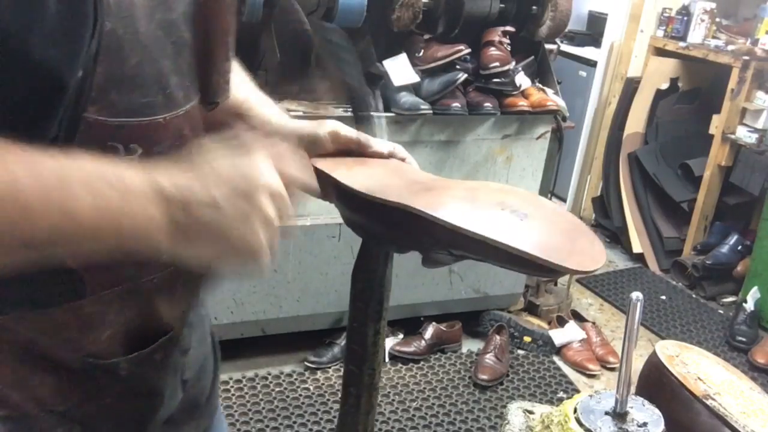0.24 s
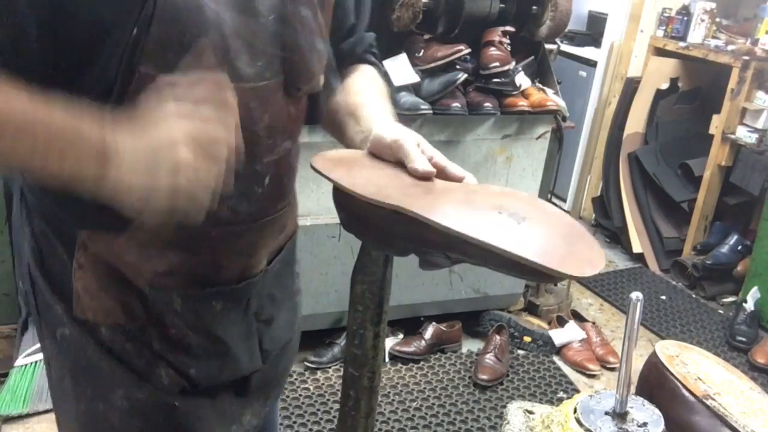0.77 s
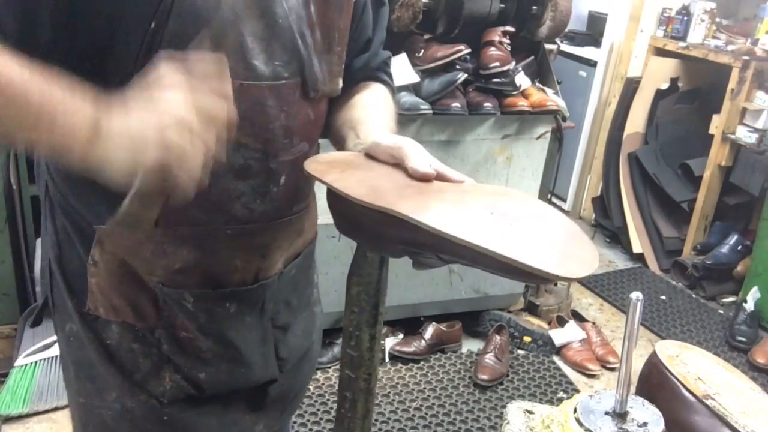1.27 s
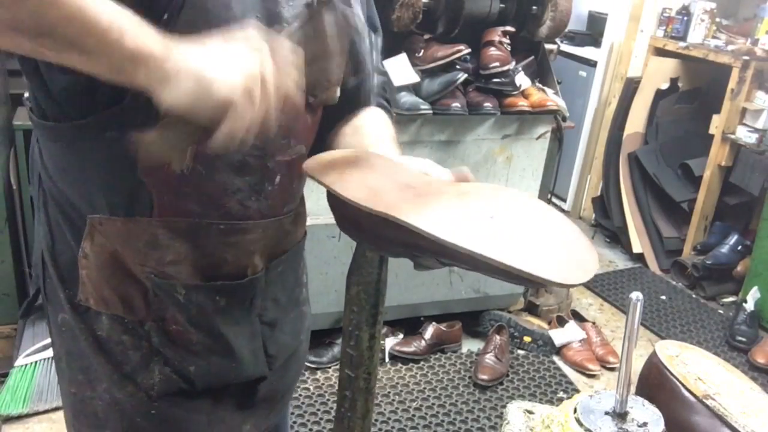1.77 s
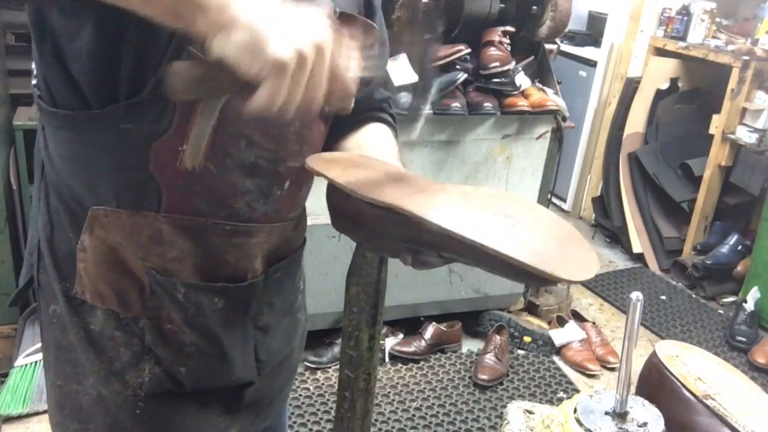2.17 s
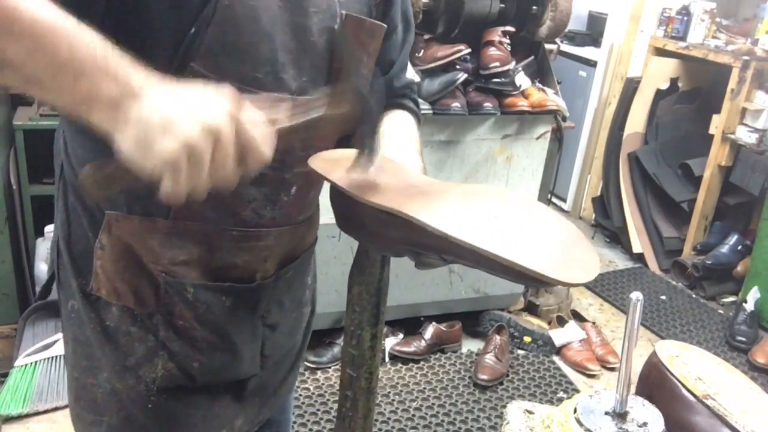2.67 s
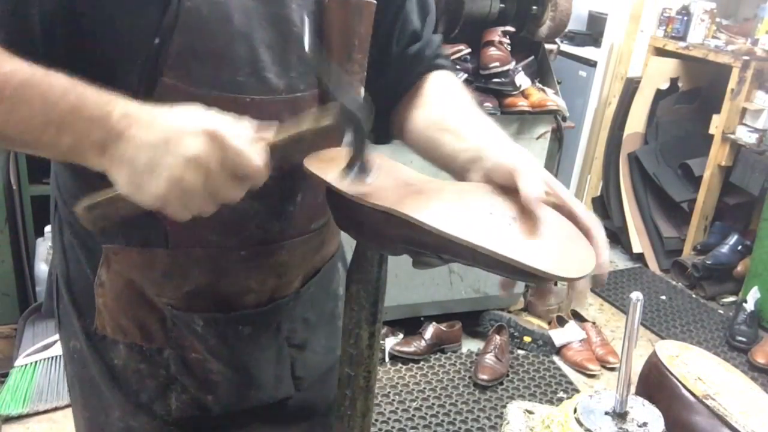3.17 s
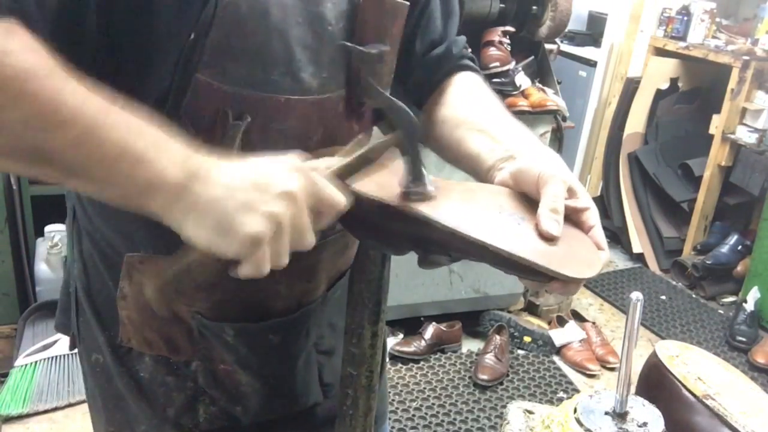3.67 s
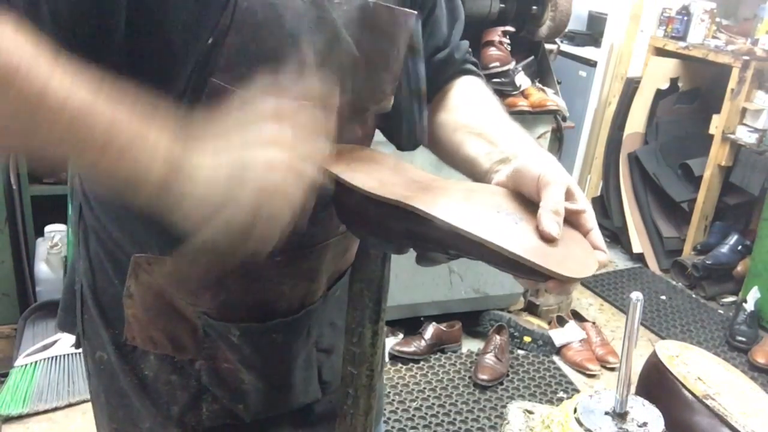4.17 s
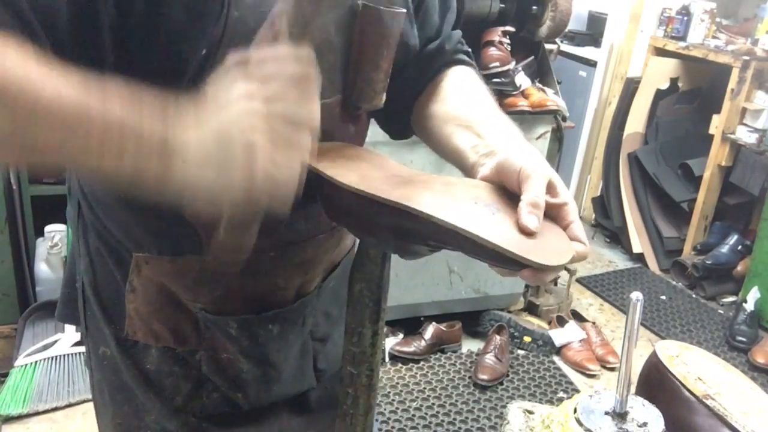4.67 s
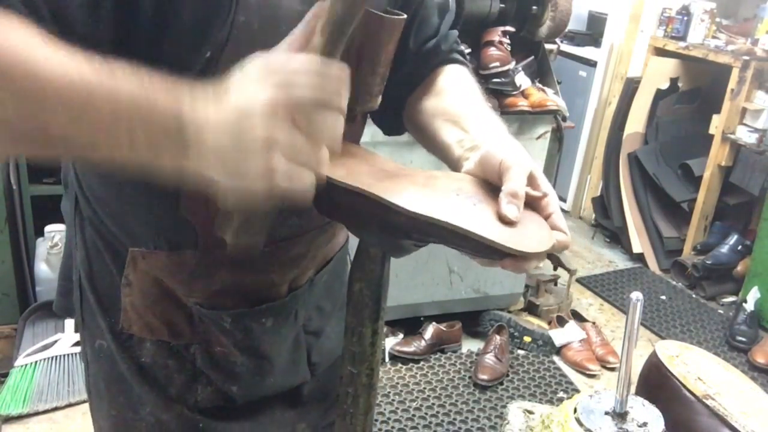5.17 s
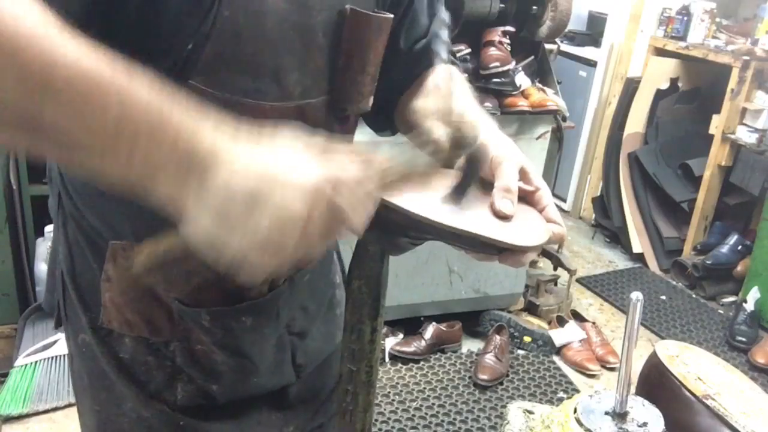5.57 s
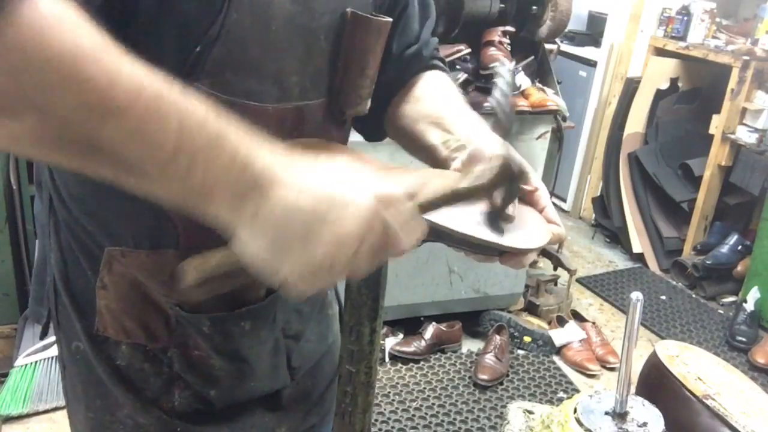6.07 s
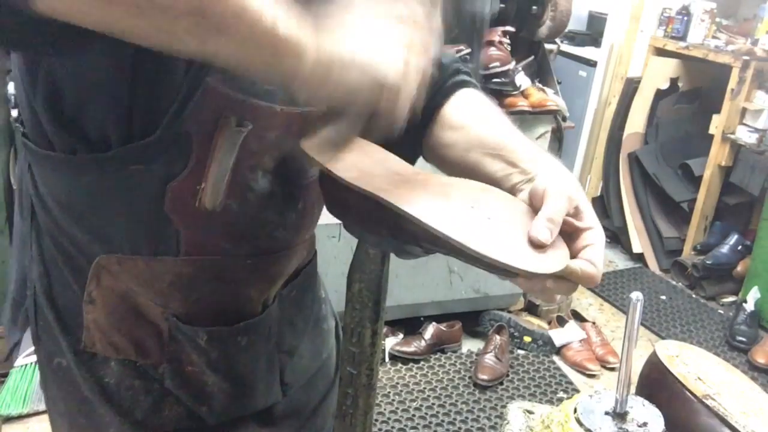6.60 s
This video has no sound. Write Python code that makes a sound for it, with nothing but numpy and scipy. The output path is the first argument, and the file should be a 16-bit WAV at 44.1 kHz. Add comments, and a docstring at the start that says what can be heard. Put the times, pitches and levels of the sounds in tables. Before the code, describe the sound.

A hammer knocks rapidly and evenly on a leather shoe sole over an iron last, loud and close, with a soft workshop hum beneath.

```python
"""A shoemaker hammers a leather sole on an iron last, about four blows a second, first towards the heel, then the waist.
Each blow is filtered bursts for the crack and knock of the sole, decaying sines for the ringing hammer and iron,
and low sines for the thud of stand and floor. In two pauses a hand slides over the shoe as swelling noise; a short
soft swell also comes in just before the final blow, and small ticks of handling are scattered between.
Behind it the small workshop answers with dense echoes and hums softly; a fast limiter holds the attacks down."""
import sys
import numpy as np
from scipy import signal
from scipy.fft import rfft, irfft
from scipy.io import wavfile
from scipy.ndimage import uniform_filter1d

SR = 44100
rng = np.random.default_rng(int(sys.argv[2]) if len(sys.argv) > 2 else 0)


def to_wav(s):
    """Save 16-bit WAV."""
    ch = np.atleast_2d(s).T  # columns
    pcm = np.round(np.clip(ch, -1, 1) * 32767)  # PCM
    wavfile.write(sys.argv[1], SR, pcm.astype(np.int16))


N = 301581
SIZE = 24576  # samples given to one blow
AGE = np.arange(SIZE) / SR  # seconds since the start of a blow
HZ = np.maximum(np.arange(SIZE // 2 + 1) * SR / SIZE, 1)


def from_db(db):
    """Decibels to gain."""
    return 10 ** (np.asarray(db) / 20)


def unit(x):
    """Scale to an energy of one."""
    return x / np.sqrt(np.sum(x ** 2) + 1e-20)


def at_hz(points, hz):
    """Read a curve on a log-frequency axis."""
    points = np.array(points)
    return np.interp(np.log(hz), np.log(points[:, 0]), points[:, 1])


def at_place(ends, place):
    """A value between the heel (0) and the waist (1)."""
    return (1 - place) * ends[0] + place * ends[1]


def fade(t60):
    """Exponential decay over one blow, falling 60 dB in t60 seconds."""
    return np.exp(-np.log(1000) * AGE / t60)


def add(out, start_s, sound):
    """Mix a sound in at a time, trimmed to the scene."""
    start = round(start_s * SR)
    first, last = max(start, 0), min(start + len(sound), N)
    out[first:last] += sound[first - start:last - start]


def wander(per_s, count):
    """A smooth random curve over the scene, taking a new value per_s times a second."""
    return np.interp(np.arange(N) / SR * per_s, np.arange(count), rng.standard_normal(count))


def noise(spectrum):
    """Steady coloured noise, rms 1."""
    hz = np.maximum(np.arange(N // 2 + 1) * SR / N, 1)
    coloured = irfft(rfft(rng.standard_normal(N)) * from_db(at_hz(spectrum, hz)), N)
    return np.sqrt(N) * unit(coloured)


def bumps_db(peaks, spread):
    """Gain in dB of a set of resonances, each a little stronger or weaker every time."""
    gain_db = 0
    for hz, width_hz, db in peaks:
        height_db = db * (1 + spread * rng.normal())
        gain_db = gain_db + height_db / (1 + (2 * (HZ - hz) / width_hz) ** 2)
    return gain_db


def shelf_db(hz, db):
    """Gain in dB of a treble shelf."""
    return db / (1 + (hz / HZ) ** 4)


def through(x, gain_db):
    """Causal (minimum-phase) filter with the given gain, made by folding the cepstrum."""
    cepstrum = irfft(np.log(from_db(gain_db)))
    cepstrum[1:SIZE // 2] *= 2
    cepstrum[SIZE // 2 + 1:] = 0
    return irfft(rfft(x) * np.exp(rfft(cepstrum)))


# motor hum, two steady pitches: pitch_hz [Hz], level_db [dB rms before the waver]
MOTOR_HUM = [(59, -55.5), (119, -62)]
# colour of the air in the workshop: pitch_hz [Hz], level_db [relative dB per Hz]
AIR_COLOUR = [(30, -4), (90, 13), (194, -4.5), (300, -6), (540, -8), (866, -10.5), (1280, -12),
              (2170, -16.5), (4080, -19.5), (6720, -25), (14000, -38)]


def workshop(air_db=-54.5, waver_db=2.5, waver_per_s=6):
    """A motor hum of two gently wavering sines under steady coloured room noise."""
    t, hum = np.arange(N) / SR, 0
    for hz, db in MOTOR_HUM:
        level_db = db + waver_db * wander(waver_per_s, 128)
        hum = hum + np.sqrt(2) * from_db(level_db) * np.sin(2 * np.pi * (hz * t + rng.random()))
    return hum + from_db(air_db) * noise(AIR_COLOUR)


# decay of the workshop: pitch_hz [Hz], t60_s [s]
ROOM_DECAY = [(100, 0.32), (400, 0.19), (1200, 0.16), (3500, 0.16), (7000, 0.14), (15000, 0.092)]
# colour of its echoes: pitch_hz [Hz], level_db [relative dB]
ECHO_COLOUR = [(100, 11.5), (250, -4), (350, -0.5), (460, -5.5), (600, 0.5), (1150, 1), (1700, -4),
               (2900, 0.5), (3700, -2.5), (7000, -4.5), (9500, -3.5), (15000, -7)]


def echoes(build_s=0.0073, gap_s=0.0048):
    """The workshop's answer to a click: dense echoes that build up, then die band by band."""
    white, tail = rfft(rng.standard_normal(SIZE)), 0
    swell = 1 - np.exp(-np.maximum(AGE - gap_s, 0) / build_s)
    edges = [0, *np.geomspace(150, SR / 2, 11)]
    for low, high in zip(edges, edges[1:]):
        centre = (low + high) / 2
        band = irfft(white * ((HZ >= low) & (HZ < high)))
        envelope = unit(swell * fade(at_hz(ROOM_DECAY, centre)))
        tail = tail + band * envelope * from_db(at_hz(ECHO_COLOUR, centre))
    return tail


# short swells of soft noise, the last just before the final blow:
# start_s [s], length_s [s], level_db [dB at mid-swell, before the unevenness]
NOISE_SWELLS = [(0.544, 0.31, -68), (2.98, 0.38, -75.5), (6.67, 0.12, -53)]
# colour of the swells and the ticks: pitch_hz [Hz], level_db [relative dB per Hz]
SOFT_COLOUR = [(200, -22), (1200, 5.5), (2200, 5.5), (4500, 0), (8000, -12), (15000, -25.5)]


def soft_swells(flutters_per_s=35, flutter_db=2.5):
    """Noise swells and fades unevenly: a hand on the shoe in two pauses, then a short swell by the final blow."""
    t, swell = np.arange(N) / SR, 0
    for start_s, length_s, db in NOISE_SWELLS:
        progress = np.clip((t - start_s) / length_s, 0, 1)
        swell = swell + from_db(db) * np.sin(np.pi * progress)
    flutter = from_db(flutter_db * wander(flutters_per_s, 512))
    return swell * flutter * noise(SOFT_COLOUR)


# small ticks of handling: start_s [s], level_db [dB peak]
HANDLING_TICKS = [(0.66, -45.5), (0.676, -45.5), (1.908, -27), (2.176, -32), (3.051, -37), (6.575, -41)]


def ticks(tick_t60=0.014, room_db=-5):
    """The shoe ticks as it shifts: short noise bursts with the room's echoes."""
    out = np.zeros(N)
    for start_s, db in HANDLING_TICKS:
        burst = unit(rng.standard_normal(SIZE) * fade(tick_t60))
        tick = through(burst + from_db(room_db) * echoes(), at_hz(SOFT_COLOUR, HZ))
        add(out, start_s, from_db(db) * tick / np.abs(tick).max())
    return out


# the stand and the boards under it: delay_s [s], pitch_hz [Hz], level_db [relative dB], t60_s [s]
FLOOR_MODES = [(.003, 67, -19, 0.15), (.005, 135, -26, 0.11), (0.0355, 102, -15, 0.051),
               (0.046, 54.85, -33, 0.94), (0.044, 91.4, -38, 0.43), (0.043, 112, -40, .45)]


def floor_thud(rise_s=0.0019):
    """The stand thuds almost at once; the boards rebound a moment later and rumble on as low sines."""
    thud = 0
    for delay_s, hz, db, t60 in FLOOR_MODES:
        age = np.maximum(AGE - delay_s, 0)
        envelope = (1 - np.exp(-age / rise_s)) * np.exp(-np.log(1000) * age / t60)
        thud = thud + from_db(db) * envelope * np.sin(2 * np.pi * hz * age)
    return thud


def ringing(modes, spread_db=2.5, detune=0.0046, waver=1.0, waver_hz=70, longest_t60=.19):
    """Struck modes, each with a new strength at every blow; their own echoes make them waver."""
    out = np.zeros(SIZE)
    for hz, db, t60 in modes:
        knots = rng.standard_normal((2, 64))
        scatter = np.interp(AGE * waver_hz, np.arange(64), knots[0] + 1j * knots[1])
        tone = np.exp(2j * np.pi * hz * (1 + detune * rng.normal()) * AGE)
        wavering = ((1 + waver * scatter) * tone).imag / np.sqrt(1 + 2 * waver ** 2)
        # hand and leather damp the metal, so no mode rings past longest_t60
        out += from_db(db + spread_db * rng.normal()) * fade(min(t60, longest_t60)) * wavering
    return out


# modes of the iron last and stand: pitch_hz [Hz], level_db [relative dB], t60_s [s before damping]
IRON_MODES = [(1187, -17.5, .19), (970, -31.5, .15), (2080, -30.5, 0.25), (4320, -36, 0.18),
              (5464, -37.5, 0.47), (5920, -40, 0.27), (6240, -42, .14), (7200, -47.5, 0.19),
              (7100, -41, .14), (8800, -52, .12)]


def iron_ring(level_db):
    """The iron last and stand ring briefly as damped modes."""
    return from_db(level_db) * ringing(IRON_MODES)


# modes of the hammer and its handle: pitch_hz [Hz], level_db [relative dB], t60_s [s before damping]
HAMMER_MODES = [(353.3, -27, 0.27), (596, -34.5, .19), (1278, -32, 0.2), (2180, -32, 0.22),
                (3070, -37, 0.16), (3170, -32, 0.2), (3720, -35.5, .11), (3950, -39, .13),
                (4220, -39.5, .13)]


def hammer_ring(lively_db, per_lively=1.1):
    """The hammer and handle ring as damped modes, louder on a lively blow."""
    return from_db(per_lively * lively_db) * ringing(HAMMER_MODES)


def contact(shortest_s=.0006, longest_s=.0026, bounce=0.64, crush_t60=0.043, crush_db=-9,
            bass_lag_s=0.002794, lag_hz=800, soft_hz=4500, count=3):
    """The push into the sole: a soft click smeared by quick reflections, with the crunch of the leather giving way."""
    # bending waves travel slower at low pitch, so the knock arrives after the crack
    travel_s = bass_lag_s / (1 + (HZ / lag_hz) ** 2)
    dispersion = np.exp(-2j * np.pi * np.cumsum(travel_s) * SR / SIZE)
    softness = 1 / (1 + 1j * HZ / soft_hz)
    crush = from_db(crush_db) * unit(rng.standard_normal(SIZE) * fade(crush_t60))
    smear = 1
    for delay_s in np.geomspace(shortest_s, longest_s, count) * rng.uniform(.8, 1.2, count):
        lag = np.exp(-2j * np.pi * HZ * delay_s)
        smear = smear * (lag - bounce) / (1 - bounce * lag)  # all-pass reflection
    return irfft(dispersion * softness * (smear + rfft(crush)))


def crack(length_s=.0017, low_hz=3000):
    """The steel face slaps flat on the leather: a very short, bright burst."""
    burst = unit(rng.standard_normal(SIZE) * np.exp(-(AGE / length_s) ** 2))
    return signal.sosfilt(signal.butter(2, low_hz, "high", fs=SR, output="sos"), burst + 1e-18)


def lesser_modes(count=24):
    """Gain in dB of the shoe's many small resonances, new at every blow; a shelf offsets their mean lift."""
    hz = np.geomspace(1400, 9000, count) * np.exp(rng.normal(0, .03, count))
    return bumps_db(zip(hz, .025 * hz, rng.uniform(0, 8, count)), 0) - shelf_db(1300, 1.5)


# response of the shoe on the last, struck at either end: pitch_hz [Hz], level_db [relative dB]
HEEL_RESPONSE = [(60, -24.5), (190, -21.5), (350, -11.5), (600, -7), (1200, -10.5), (2200, -11.5),
                 (3700, -15.5), (5000, -25), (7000, -27.5), (11000, -35.5), (16000, -38.5)]
WAIST_RESPONSE = [(60, -20), (190, -15), (320, -9), (600, -8.5), (1200, -6), (2200, -7.5), (4000, -10.5),
                  (5000, -15), (7000, -20), (8200, -29), (16000, -35)]
# its resonances and the dips between them: pitch_hz [Hz], width_hz [Hz], level_db [dB before the spread]
HEEL_RESONANCES = [(354, 83, 7), (623, 140, 6), (814, 100, -4), (1030, 93, 2.5), (1118, 18, -8),
                   (1246, 110, 4), (1390, 180, 3), (1630, 120, 1), (2190, 170, 3.5), (3065, 390, -11.5),
                   (3200, 120, 11), (3680, 80, 3), (5920, 1300, 5)]
WAIST_RESONANCES = [(510, 44, -2.5), (685, 96, 8), (773, 90, -8.5), (972, 110, 5), (1210, 55, 1.5),
                    (1360, 58, -4.5), (1556, 130, -1), (1834, 110, -5), (2120, 360, 3.5), (2880, 580, -10),
                    (3160, 370, 8.5), (3700, 200, 3.5), (4220, 250, 4)]
# lift of the clack resonance: heel_db [dB], waist_db [dB], both before force
CLACK_LIFT = (9, 4)
CLACK_PER_FORCE = .8  # dB per dB of force
# a flat landing deepens the knock and sharpens the crack and the snap: dB per dB of flatness
KNOCK_PER_FLAT, CRACK_PER_FLAT, SNAP_PER_FLAT = 1, .7, 1


def sole(place, force_db, flat_db, lively_db, clack_hz, direct_db=33, wet_db=27.5, slap_db=0,
         room_peaks=0.84, spread=0.18, knock_hz=571, knock_width=110, knock_peak_db=5, clack_width=80):
    """One blow on the leather, coloured by where, how hard and how squarely the hammer lands."""
    knock_db = KNOCK_PER_FLAT * flat_db
    crack_db = -2.43 + CRACK_PER_FLAT * flat_db
    snap_db = -0.3 + SNAP_PER_FLAT * flat_db
    clack_db = at_place(CLACK_LIFT, place) + CLACK_PER_FORCE * force_db
    colour = at_place((at_hz(HEEL_RESPONSE, HZ), at_hz(WAIST_RESPONSE, HZ)), place)
    colour = colour + knock_db - shelf_db(730, knock_db)  # knock: the lows
    colour = colour + shelf_db(1800, crack_db) + shelf_db(5600, snap_db - crack_db)
    peaks = at_place((bumps_db(HEEL_RESONANCES, spread), bumps_db(WAIST_RESONANCES, spread)), place)
    # each blow favours one low resonance (the knock) and one about an octave above it (the clack)
    favoured = [(knock_hz, knock_width, knock_peak_db), (clack_hz, clack_width, clack_db)]
    peaks = peaks + bumps_db(favoured, 0) + lesser_modes()
    direct = through(contact() + from_db(slap_db) * crack(), direct_db + colour + peaks)
    # the room gathers sound from all sides of the shoe, which evens out its peaks
    room = through(echoes(), wet_db + lively_db + colour + room_peaks * peaks)
    return direct + room


# hammer blows: start_s [s], place [0 heel - 1 waist], force_db [dB], flatness_db [dB],
# liveliness_db [dB], clack_hz [Hz]
HAMMER_BLOWS = [(-0.045, 0.11, 3, -0.5, -4, 1204), (0.2038, .1, 0, -4.5, 1.5, 1235),
                (0.4517, 0, -2.5, -2, 0.5, 1217), (0.8824, 0.048, -1, 0, 3.5, 1270),
                (1.133, 0.13, -1, -2.5, 4.5, 1363), (1.3855, .1, -0.5, 1.5, -1.5, 1233),
                (1.6272, 0.18, -3.5, 0.5, 4.5, 1410), (1.8759, 0.16, -2, -4.5, -1, 1038),
                (2.1393, 0.3, -1.5, -1, -4, 1030), (2.4175, .6, 3, -6.5, 3, 1147),
                (2.666, 0.2, 3, -2, 1, 1166), (2.9085, 0.021, 1, -3, 1.5, 1175),
                (3.4602, 0.64, -2.5, 0, 2.5, 1010), (3.7216, 0.83, 1, -2.5, 3.5, 1196),
                (3.9695, 0.76, 2, -3, -0.5, 1250), (4.2703, 1, -2, -2, 3, 1186),
                (4.5292, 0.79, -.5, -2.5, 0.5, 1030), (4.795, 1, 0.5, -3, 0, 997),
                (5.0535, 0.95, -3, -1, 0.5, 996), (5.3107, 0.98, -1, -0.5, -1, 1213),
                (5.5741, .9, -0.5, 0, 1, 1050), (5.825, 0.65, -3, -0.5, 2, 1202),
                (6.083, 0.87, -1.5, 1, 1.5, 1098), (6.3224, 0.61, -4.5, -1.5, 4, 1190),
                (6.714, 0.23, -4, 2, -1, 930)]
# the waist lies over the stand, so blows there drive iron and floor harder: heel_db [dB], waist_db [dB]
IRON_DRIVE = (-9.5, 2)
THUD_DRIVE = (-4.5, 0.27)
IRON_PER_FORCE, THUD_PER_FORCE = 0.54, .25  # dB per dB of force


def hammering():
    """Every blow sounds the sole, the hammer, the iron and the floor together."""
    out, thud = np.zeros(N), floor_thud()
    for start_s, place, force_db, flat_db, lively_db, clack_hz in HAMMER_BLOWS:
        place = np.clip(place, 0, 1)
        struck = sole(place, force_db, flat_db, lively_db, clack_hz)
        # a dead blow leaves the hammer, the iron and the room quiet
        struck = from_db(force_db) * (struck + hammer_ring(lively_db))
        iron = iron_ring(at_place(IRON_DRIVE, place) + IRON_PER_FORCE * force_db + lively_db)
        floor = from_db(at_place(THUD_DRIVE, place) + THUD_PER_FORCE * force_db) * thud
        add(out, start_s, struck + iron + floor)
    return out


def scene():
    """All sources at one microphone."""
    return (workshop() + soft_swells() + ticks() + hammering())[None]


def record(dry, limit_db=-4.0, release_db_per_s=200, bass_hz=42, ceiling=.72, cutoff_hz=15900):
    """The microphone drops the deepest bass, a fast limiter holds attacks down, peaks are rounded, the top is cut."""
    dry = signal.sosfilt(signal.butter(4, bass_hz, "high", fs=SR, output="sos"), dry)
    recovery = release_db_per_s * np.arange(N) / SR
    over_db = np.maximum(20 * np.log10(np.abs(dry) + 1e-9) - limit_db, 0)
    # the reduction jumps up with each peak, then lets go at a steady rate
    held_db = np.maximum.accumulate(over_db + recovery, axis=-1) - recovery
    limited = dry * from_db(-uniform_filter1d(held_db, size=32))
    rounded = limited / (1 + (limited / ceiling) ** 4) ** .25
    return signal.sosfilt(signal.ellip(10, .1, 80, cutoff_hz, fs=SR, output="sos"), rounded)


dry = scene()
out = record(dry)
to_wav(out)
```